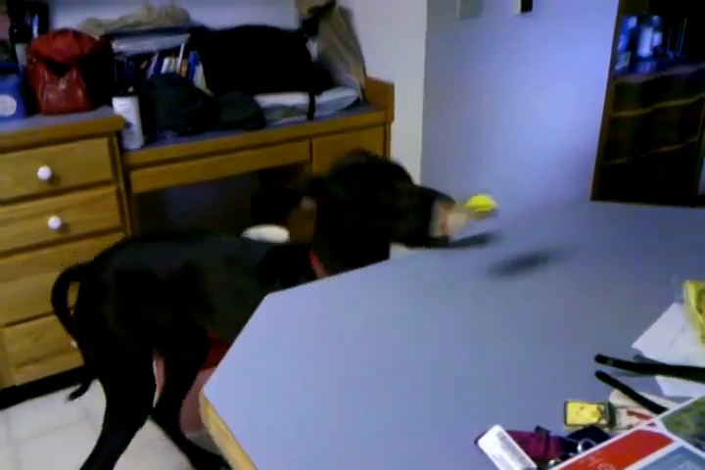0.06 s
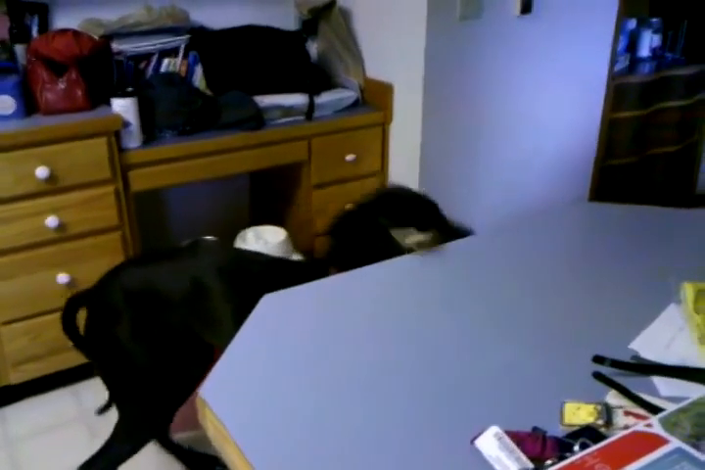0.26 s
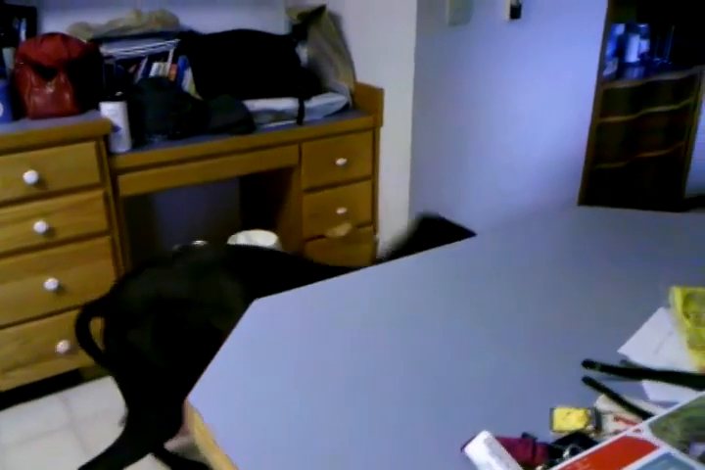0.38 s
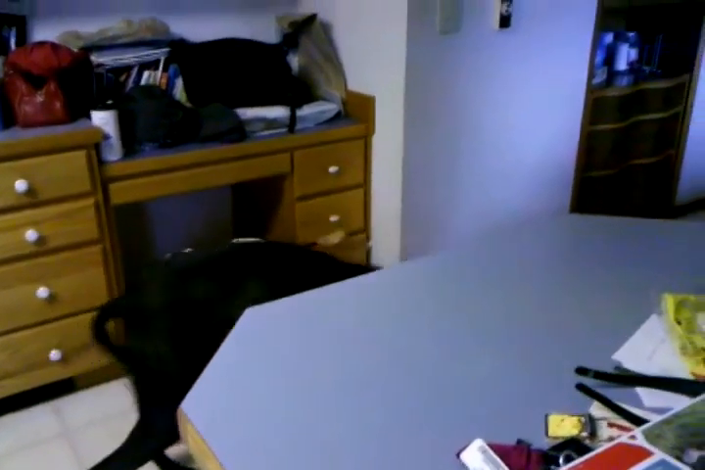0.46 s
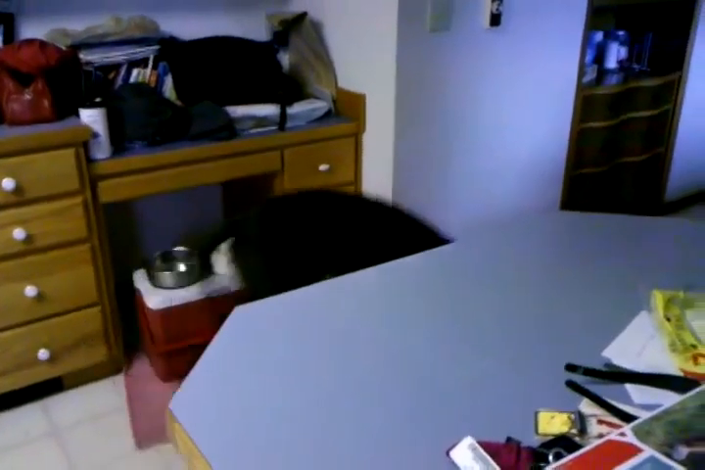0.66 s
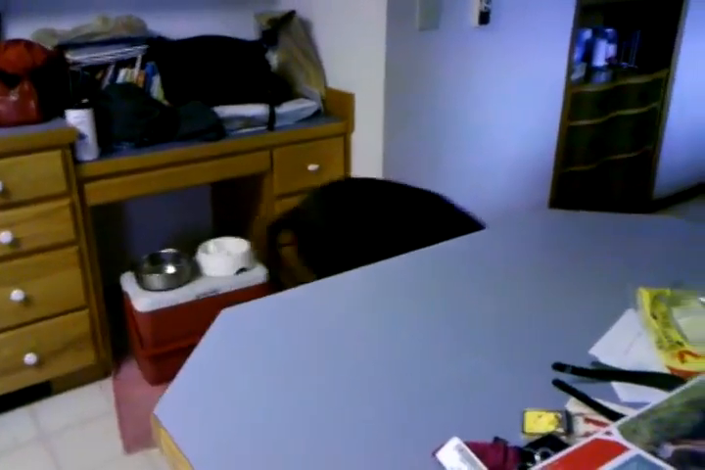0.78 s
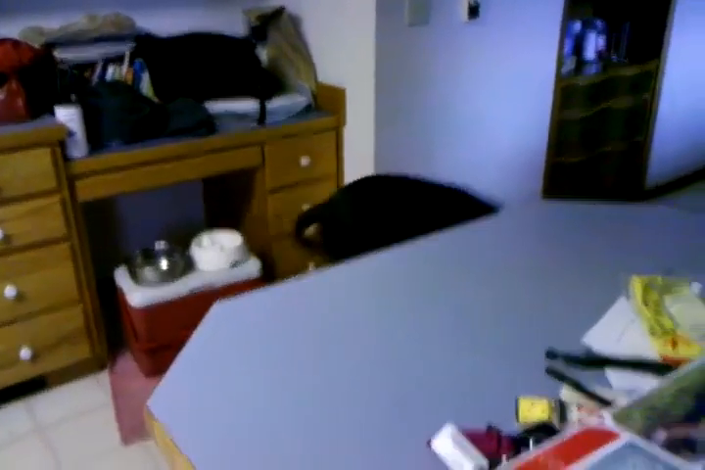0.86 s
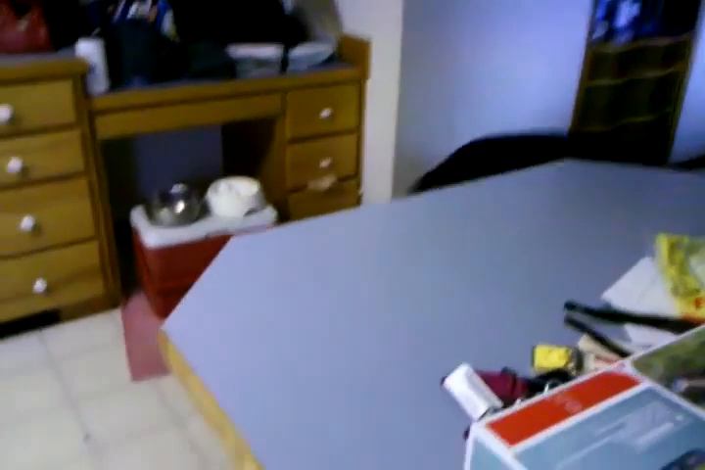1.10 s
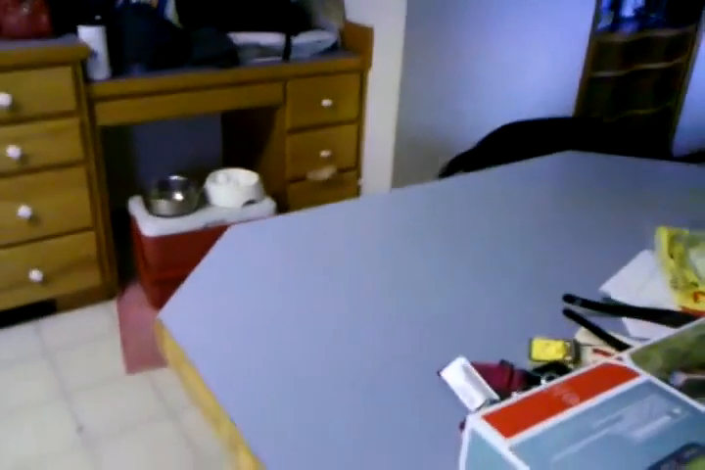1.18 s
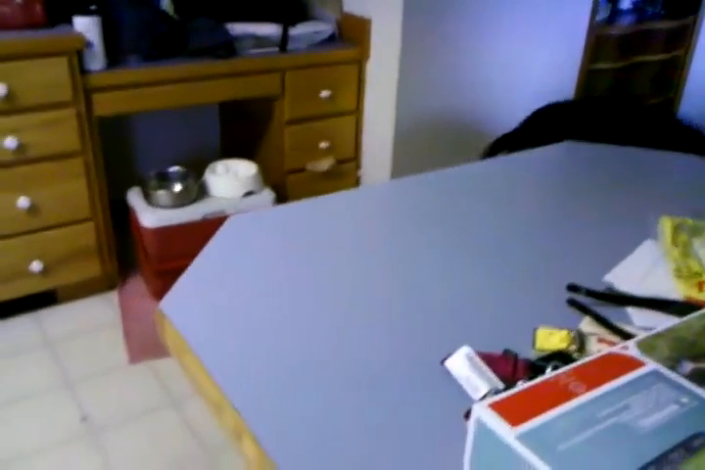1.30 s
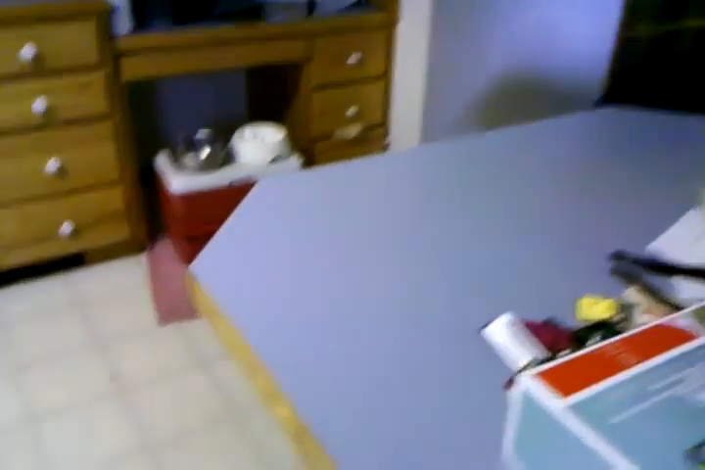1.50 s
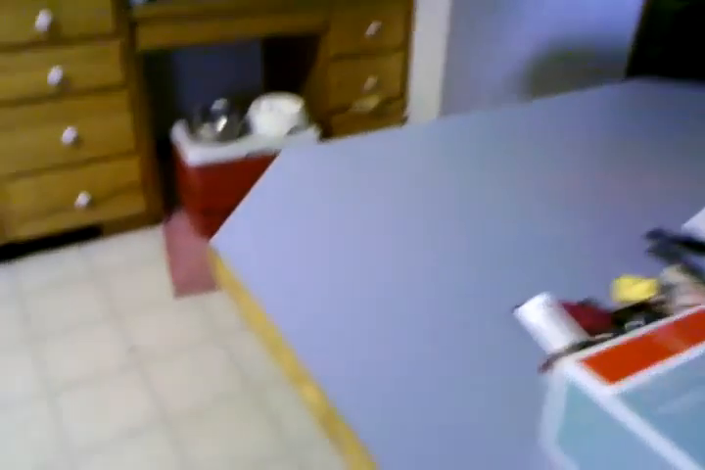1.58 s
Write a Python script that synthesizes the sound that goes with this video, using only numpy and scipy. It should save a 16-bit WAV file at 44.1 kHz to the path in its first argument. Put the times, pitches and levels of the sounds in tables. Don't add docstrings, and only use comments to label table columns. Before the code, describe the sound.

A spring trap snaps loudly on a table, clatters down, and a startled dog scrambles away

```python
import sys
import numpy as np
from scipy import signal
from scipy.fft import rfft, irfft
from scipy.io import wavfile

SR = 44100
rng = np.random.default_rng(int(sys.argv[2]) if len(sys.argv) > 2 else 0)


def store_pcm(level_fs):
    pcm = np.round(np.clip(level_fs, -1, 1) * 32767).astype(np.int16)
    wavfile.write(sys.argv[1], SR, np.atleast_2d(pcm).T)


def gain_from_decibels(decibels):
    exponent = np.asarray(decibels, float) / 20
    return 10 ** exponent


N = 72765

# [Hz, dB]
TRAP_COLOUR = [(700, -28.5), (2450, -12), (2900, -5), (3450, -11.5), (4900, -8.5), (5600, 0.8), (6150, -4),
               (6800, -3.5)]


def at_hz(points, hz):
    table = np.array(points)
    return np.interp(np.log(hz), np.log(table[:, 0]), table[:, 1])


def rms_one(x):
    return x / np.sqrt(np.mean(x ** 2) + 1e-20)


def high_pass(x, hz):
    return signal.sosfilt(signal.butter(4, hz, "high", fs=SR, output="sos"), x)


def ring(x, hz, t60_s):
    r = gain_from_decibels(-60 / (t60_s * SR))
    w = 2 * np.pi * hz / SR
    return signal.lfilter([0, np.sin(w)], [1, -2 * r * np.cos(w), r * r], x + 1e-18)


def modes(x, rows, offset_db):
    return sum(gain_from_decibels(db + offset_db) * ring(x, hz, t60_s) for hz, db, t60_s in rows)


def body(x, peaks):
    out = 0
    for k, (hz, width_hz, db) in enumerate(peaks):
        r = np.exp(-np.pi * width_hz / SR)
        zeros = (1 - r * r) / 2 * np.array([1, 0, -1])
        poles = [1, -2 * r * np.cos(2 * np.pi * hz / SR), r * r]
        out = out + (-1) ** k * gain_from_decibels(db) * signal.lfilter(zeros, poles, x + 1e-18)
    return out


def colour(x, points):
    size = 4096
    hz = np.maximum(np.fft.rfftfreq(size, 1 / SR), 1)
    cepstrum = irfft(np.log(gain_from_decibels(at_hz(points, hz))), size)
    cepstrum[1:size // 2] *= 2
    cepstrum[size // 2 + 1:] = 0
    response = irfft(np.exp(rfft(cepstrum)), size)
    return signal.fftconvolve(x, response)[:len(x)]


def bursts(rows, decay_s):
    t = np.arange(N) / SR
    shape = sum(gain_from_decibels(db) * (t >= s) * np.exp(-np.maximum(t - s, 0) / decay_s) for s, db in rows)
    return shape * rng.standard_normal(N)


def background():
    # [Hz, dB per Hz]
    air_colour = [(18, -62), (30, -43), (191, -6.5), (258, -1), (290, -13.5), (349, -7.5), (530, -18),
                  (803, -21.5), (7590, -42), (9870, -104), (16700, -120)]
    # [Hz, dB rms]
    hum_lines = [(156, -62.5), (210, -66.5), (264, -61.5), (313, -61.5), (414, -77)]
    air_db, hum_width_hz = -51, 8
    hz = np.maximum(np.fft.rfftfreq(N, 1 / SR), 1)
    spectrum = rfft(rng.standard_normal(N)) * gain_from_decibels(at_hz(air_colour, hz))
    out = gain_from_decibels(air_db) * rms_one(irfft(spectrum, N))
    for f, db in hum_lines:
        line = body(rng.standard_normal(N + SR), [(f, hum_width_hz, 0)])[SR:]
        out = out + gain_from_decibels(db) * rms_one(line)
    return out


def room_response():
    # [Hz, s]
    room_t60 = [(150, 0.25), (400, 0.51), (1040, 0.56), (2760, 0.58), (7280, 0.59)]
    gap_s, early_db, early_s = 0.0027, 4, 0.09
    flutter_s, flutter_db, flutter_from_hz = 0.011, 1.5, 1900
    t, out = np.arange(SR) / SR, 0
    white = rng.standard_normal((2, SR))
    edges_hz = 60 * 2. ** np.arange(9)
    for k, (low, high) in enumerate(zip(edges_hz, edges_hz[1:])):
        octave = signal.butter(2, [low, high], "band", fs=SR, output="sos")
        decay_db = -60 * t / at_hz(room_t60, np.sqrt(low * high))
        if low > flutter_from_hz:
            decay_db = decay_db + flutter_db * np.cos(2 * np.pi * t / flutter_s)
        out = out + signal.sosfilt(octave, white[k % 2]) * gain_from_decibels(decay_db)
    out = out * np.clip(t / gap_s, 0, 1) * gain_from_decibels(early_db * np.exp(-t / early_s))
    return out / np.sqrt(np.sum(out ** 2))


def paws():
    # [s, dB, Hz]
    thuds = [(0.0, -36.5, 300), (0.164, -40, 400), (0.265, -21.5, 210), (0.309, -33, 180),
             (0.552, -35.5, 200), (0.601, -33, 350), (0.723, -31.5, 196), (0.742, -38, 546),
             (1.041, -43.5, 250), (1.09, -49, 315), (1.245, -36.5, 242), (1.269, -38, 180)]
    t60_s, out = 0.049, 0
    for s, db, hz in thuds:
        floor = [(hz, 0.77 * hz, 0.5), (1.34 * hz, 1.3 * hz, -6)]
        out = out + body(bursts([(s, db + 20.5)], t60_s / 7), floor)
    return out


def skids():
    starts_s = [0.001, 0.56, 0.626, 0.642, 0.695, 0.789, 0.861, 0.922, 0.94, 0.966, 1.0, 1.235, 1.38, 1.507,
                1.574]
    # [s, dB, dB, ratio]
    scrapes = [(0.016, -58, -20, 1.01), (0.026, -39.5, -7, 0.6), (0.016, -35.5, -8, 1.2),
               (.012, -37, -14, 0.8), (0.042, -39.5, -11, 1.01), (0.05, -38, -9, 1.02),
               (0.038, -44, -2.5, 0.48), (0.0089, -39, -13, 1.1), (0.03, -41, -8, 2),
               (0.02, -38, -11.5, 1.02), (0.13, -45, -7.5, 1.01), (.06, -52.5, -5.5, 1.01),
               (0.064, -60.5, -8, 1.033), (0.049, -46, -11.5, 1.01), (.08, -47.5, -8.5, 1.01)]
    # [Hz, Hz, dB]
    claw_peaks = [(3320, 900, -12), (4453, 270, -4), (5064, 240, -0.9), (6470, 380, -1.9)]
    # [Hz, Hz, dB]
    floor_peaks = [(800, 410, -10.5), (1463, 160, 0), (2486, 320, -0.7)]
    attack_s, release_s, grains_per_s, spread_db = 0.0018, 0.013, 2800, 2
    t, out = np.arange(N) / SR, 0
    hits = rng.random(N) < grains_per_s / SR
    heights = gain_from_decibels(spread_db * np.minimum(rng.exponential(1, N), 5))
    grains = hits * heights * rng.choice([-1, 1], N)
    low = rms_one(body(grains[::-1], floor_peaks))
    for s, (length_s, db, low_db, pitch) in zip(starts_s, scrapes):
        high = rms_one(body(grains, np.array(claw_peaks) * [np.clip(pitch, .96, 1.05), 1, 1]))
        attack = np.clip((t - s) / attack_s, 0, 1)
        release = np.exp(-np.maximum(t - s - length_s, 0) / release_s)
        out = out + gain_from_decibels(db) * attack * release * (high + gain_from_decibels(low_db) * low)
    return out


def landings():
    # [s, dB, ms, dB, dB]
    contacts = [
        (0.4588, -8, 0.078, -20, -34),
        (0.4648, -11.5, 0.061, -31.5, -46),
        (0.4884, -24, 0.078, -19, -36.5),
        (0.5063, -11, 0.021, -20.5, -26),
        (0.524, -32, 0.14, -26, -32),
        (0.5439, -16.5, 0.14, -17, -28),
        (0.551, -17.5, 0.41, -23, -19),
        (0.564, -19, 0.28, -40, -32),
    ]
    # [Hz, dB, s]
    base_modes = [(626, -25.5, 0.024), (762, -11, 0.074), (930, -3.5, 0.026), (1122, 5, 0.0061),
                  (1262, 0.5, 0.028), (1420, 2, 0.019), (1755, 4, 0.014), (2130, 1, 0.011),
                  (3900, -1.5, 0.005)]
    # [Hz, dB, s]
    table_modes = [(259.2, -3, 0.18), (343.6, -1, 0.14), (400, -10, 0.17)]
    spread_db, base_cut_hz, rattle_s = 2.5, 320, 0.0031
    out, t = np.zeros(N), np.arange(N) / SR
    chance_db = rng.normal(0, spread_db, (len(contacts), len(base_modes)))
    for (s, db, soft_ms, _, table_db), offsets_db in zip(contacts, chance_db):
        push = np.exp(-.5 * ((t - s) * 1000 / max(soft_ms, .03)) ** 2)
        push = push / push.sum()
        struck = [(hz, m_db + d, t60_s) for (hz, m_db, t60_s), d in zip(base_modes, offsets_db)]
        out -= modes(push, struck, db - 8)
        out += modes(push, table_modes, table_db)
    rattle = bursts([(row[0], row[3]) for row in contacts], rattle_s)
    return high_pass(out, base_cut_hz) + 2.9 * colour(rattle, TRAP_COLOUR)


def trap():
    # [s, dB]
    catch_slips = [
        (0.1628, -25),
        (0.168, -43),
        (0.1792, -27.5),
        (0.185, -42.5),
        (0.1935, -17),
        (0.198, -4.5),
        (0.2, -6.5),
    ]
    # [s, dB]
    bar_strikes = [
        (0.2039, 2.5),
        (0.2079, -9),
        (0.221, -13),
    ]
    # [Hz, dB, s]
    wire_modes = [(2946, -4, 0.38), (2860, -1, .45), (3026, -2.5, .3), (4950, -10, .2), (5500, -0.5, 0.13),
                  (5726, -3.5, 0.24), (5870, -10.5, 0.078), (7050, 0, 0.24), (6735, -0.5, 0.22)]
    # [Hz, dB, s]
    boom_modes = [(180, -26, 0.052), (389, -25.5, 0.033), (603, -33.5, 0.067), (886, -28.5, 0.15)]
    # [Hz, Hz, dB]
    bar_peak = [(2949, 67, 8.5)]
    strike_db, wire_db, tick_s = 20.5, -47.5, 0.0013
    crack = np.zeros(N)
    for s, db in bar_strikes:
        crack[int(s * SR)] = gain_from_decibels(db + strike_db)
    ticks = signal.lfilter([1, -.6], [1], bursts(catch_slips, tick_s))
    snap = 3.51 * colour(crack, TRAP_COLOUR) + body(crack, bar_peak) + modes(crack, wire_modes, wire_db)
    snap = snap + 0.97 * ticks + .4 * colour(ticks, TRAP_COLOUR)
    return snap, modes(crack, boom_modes, -14.5)


def scene():
    mic_cut_hz = 92
    snap, boom = trap()
    # source, reverberation send/dB
    parts = [(snap, 4.5), (boom, -8), (landings(), -3.5), (skids(), -4.5), (paws(), -5)]
    direct = sum(x for x, _ in parts)
    send = sum(gain_from_decibels(db) * x for x, db in parts)
    wet = signal.fftconvolve(send, room_response())[:N]
    return (high_pass(direct + wet, mic_cut_hz) + background())[None]


def roll_off(x):
    return signal.sosfilt(signal.butter(12, 17000, fs=SR, output="sos"), x)


def record(dry):
    cutoff_hz, wall_hz, top_hz = 7170, 8150, 17000
    gain_db, clip = -0.12, .9
    x = signal.sosfilt(signal.cheby1(7, 1, cutoff_hz, fs=SR, output="sos"), dry) * gain_from_decibels(gain_db)
    x = signal.sosfilt(signal.cheby2(16, 70, wall_hz, fs=SR, output="sos"), x)
    x = np.clip(x, -clip, clip)
    x = signal.sosfilt(signal.cheby2(12, 60, top_hz, fs=SR, output="sos"), x)
    return roll_off(x)


dry = scene()
out = record(dry)
store_pcm(out)
```